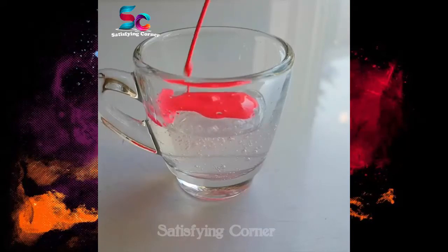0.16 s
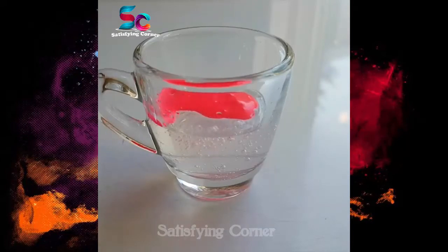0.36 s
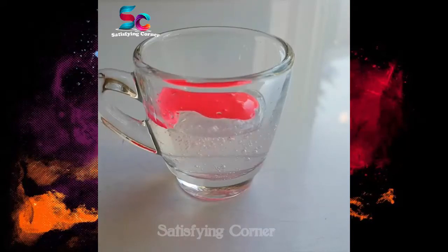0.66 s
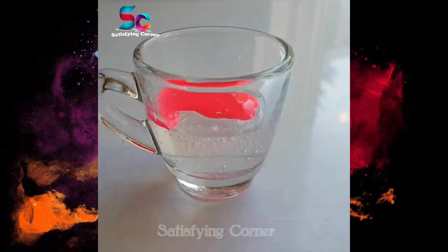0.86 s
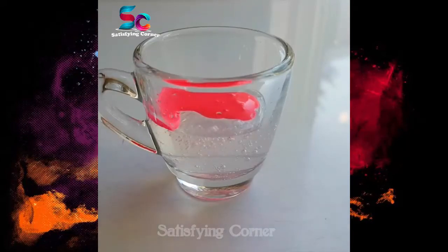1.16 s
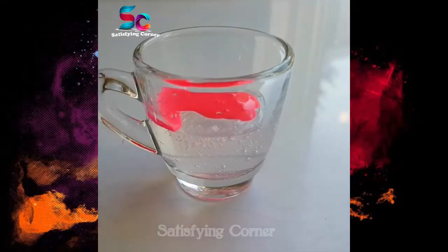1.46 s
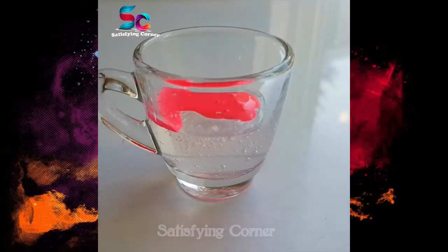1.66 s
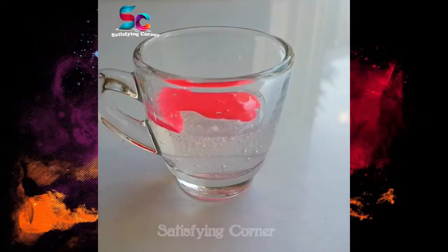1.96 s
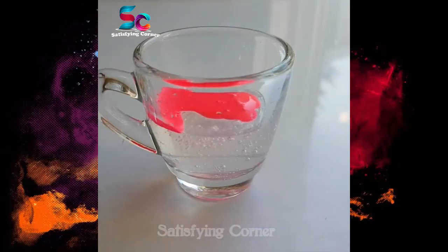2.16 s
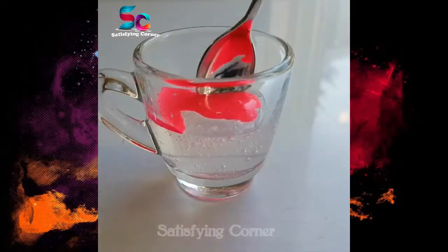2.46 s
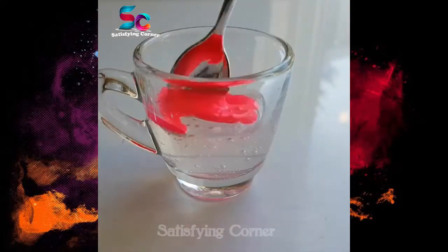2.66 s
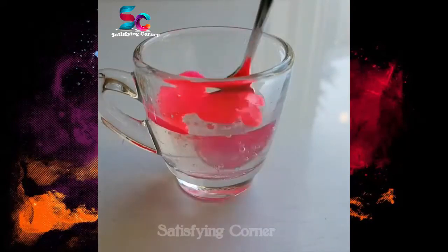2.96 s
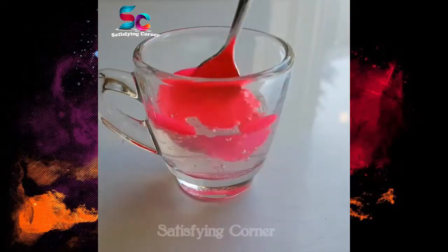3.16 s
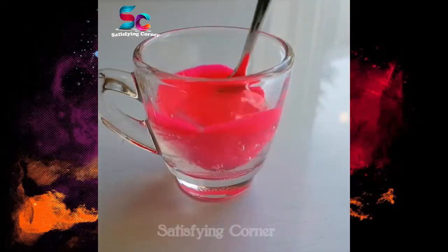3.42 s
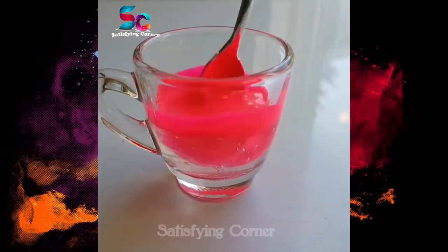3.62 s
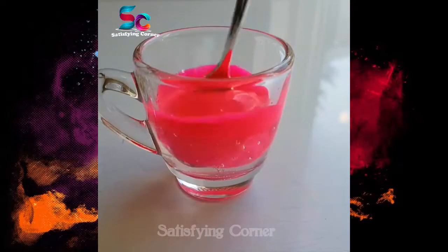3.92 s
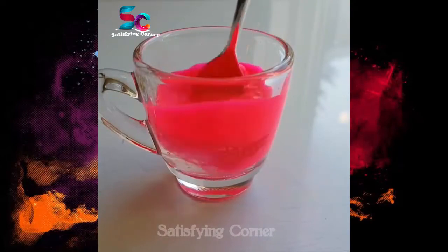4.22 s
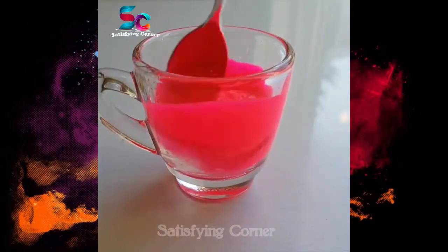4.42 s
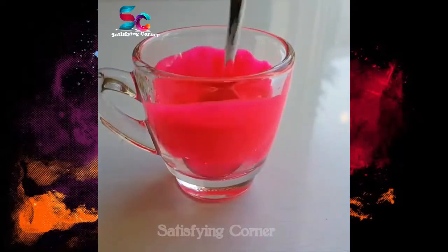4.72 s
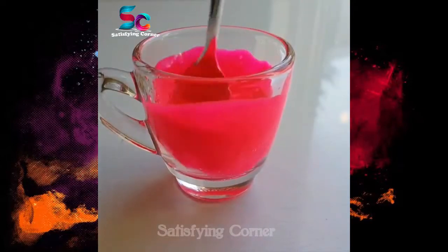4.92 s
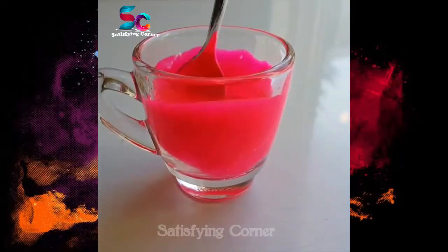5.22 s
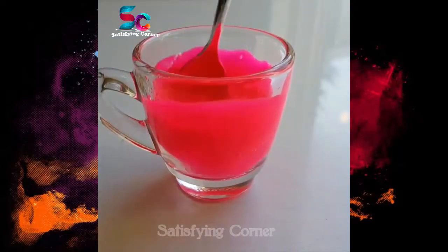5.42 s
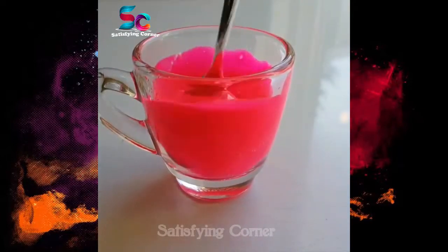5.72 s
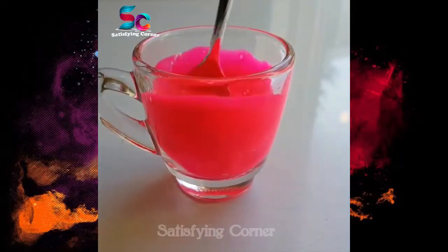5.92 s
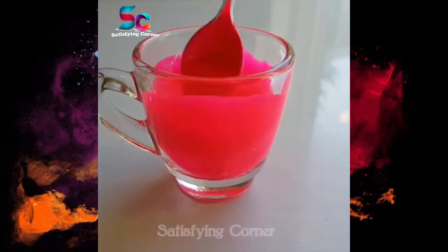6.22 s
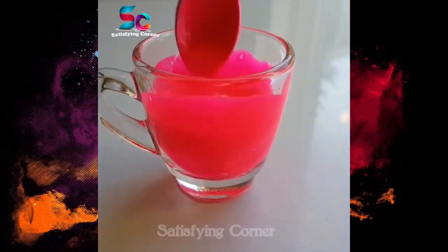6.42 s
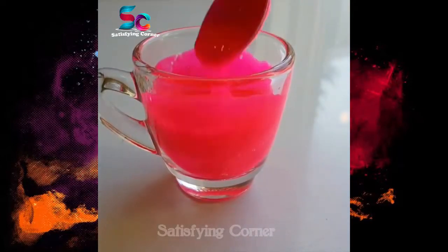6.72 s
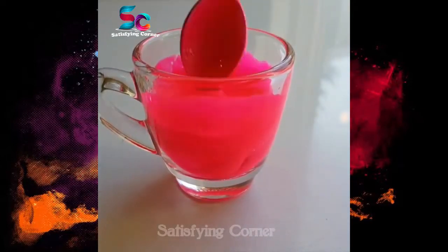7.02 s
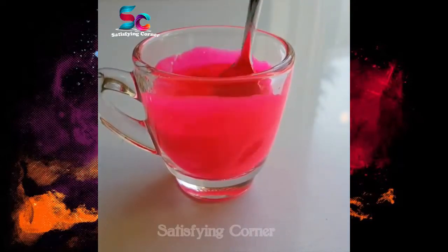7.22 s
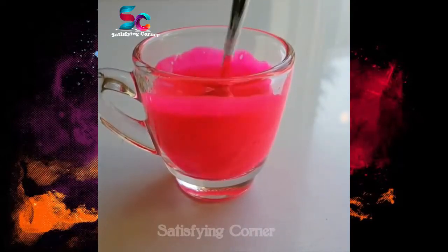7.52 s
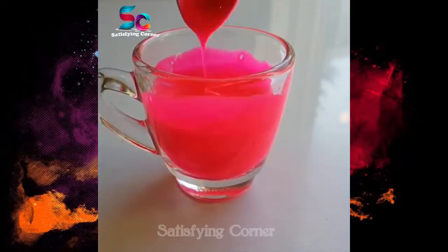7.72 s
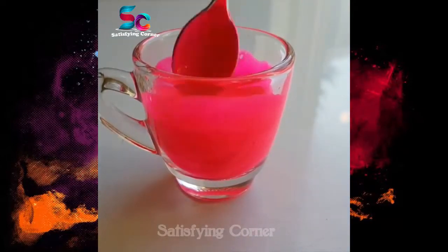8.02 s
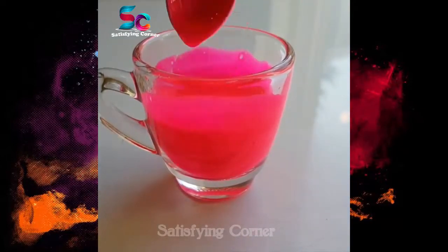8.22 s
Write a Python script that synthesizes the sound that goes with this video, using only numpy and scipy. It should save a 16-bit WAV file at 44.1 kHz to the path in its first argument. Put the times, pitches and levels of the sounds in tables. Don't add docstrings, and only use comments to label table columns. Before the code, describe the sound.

Over a soft low room hum, plastic crackles and one table thud come first, then a spoon ticks lightly against a glass cup of thick paint.

```python
import sys
import numpy as np
from scipy import signal
from scipy.io import wavfile
from scipy.ndimage import uniform_filter1d, minimum_filter1d

SR = 44100
rng = np.random.default_rng(int(sys.argv[2]) if len(sys.argv) > 2 else 0)


def magnitude_from_level(level_db):
    exponent = np.asarray(level_db, float) / 20
    return 10 ** exponent


def persist_wave(psi):
    counts = np.round(np.clip(psi, -1, 1) * 32767).astype(np.int16)
    wavfile.write(sys.argv[1], SR, np.atleast_2d(counts).T)


N = 369116

# f/Hz, left-right likeness
LIKENESS = [(25, 0.8), (70, 1), (180, 0.99), (550, 0.8), (1650, 0.028), (4970, -0.23), (15000, -0.049)]


def evened(x):
    return x / np.sqrt(np.mean(x ** 2) + 1e-20)


def read(points, hz):
    f, value = np.transpose(points)
    return np.interp(np.log(hz + 1), np.log(f + 1), value)


def follow(curve):
    s, *columns = np.transpose(curve)
    return [np.interp(np.arange(N) / SR, s, column) for column in columns]


def add(mix, s, sound):
    part = mix[:, round(s * SR):][:, :sound.shape[1]]
    part += sound[:, :part.shape[1]]


def dulled(x, hz):
    return signal.lfilter(*signal.butter(2, min(hz, 20000), fs=SR), x)


def ring(hz, db, rise, hold, turn, size=600):
    t = np.arange(size) / SR
    smother = np.exp(-(t / hold) ** 3)
    return magnitude_from_level(db) * (1 - np.exp(-t / rise)) * smother * np.sin(2 * np.pi * (hz * t + turn))


def noise(level_db, patchy_db, order=1):
    size = 2048 // order
    frames, hz = N // 512 + 5, np.fft.rfftfreq(size, order / SR)
    a, b, c, d, patches = rng.standard_normal((frames, len(hz), 5)).T
    patches = uniform_filter1d(uniform_filter1d(patches, size=12, axis=0), size=8, axis=1)
    same = np.clip(read(LIKENESS, hz), -1, 1)[:, None]
    left = a + 1j * b
    right = same * left + np.sqrt(1 - same ** 2) * (c + 1j * d)
    z = np.array([left, right]) * magnitude_from_level(level_db(hz)[:, None] + patchy_db * evened(patches))
    x = signal.istft(z, nperseg=size, noverlap=1536 // order)[1]
    return evened(signal.resample_poly(x, order, 1, axis=1)[:, :N])


def hum():
    surges = [(0.119, 0.34365, -45.5, 114.3), (.58, 0.27, -46, 108.2), (.87, .3, -47, 111.6),
              (1.14, 0.2, -46, 113), (1.33, 0.175, -44, 112.8), (1.55, 0.343, -46.5, 122.1),
              (1.9, 0.32, -47.5, 121.5), (2.38, 0.4167, -47, 112.2), (2.661, .22, -46, 111.8),
              (2.999, .44, -50, 114.7), (3.41, .26, -48, 118.6), (3.721, .46, -48.5, 108.9),
              (4.04, 0.22, -61, 112), (4.39, .22, -53, 107.7), (4.6, .16, -54, 120.2),
              (4.93, 0.31745, -48.5, 117.3), (5.15, 0.21, -48, 112.6), (5.47, 0.281, -48.5, 108.1),
              (5.829, 0.36, -45, 111.3), (6.18, 0.259, -46, 108.6), (6.398, 0.1894, -42.5, 112.4),
              (6.641, .18, -50, 113.8), (7.1, 0.555, -46, 109.1), (7.448, .3, -49.5, 107.9),
              (7.762, 0.2689, -46, 116.7), (8.041, 0.25346, -45, 113.7), ]
    waver_hz = 5.33
    out = np.zeros((2, N + SR))
    for s, length, db, hz in surges:
        t = np.arange(round(1.3 * length * SR)) / SR
        waver = waver_hz * evened(uniform_filter1d(rng.standard_normal(SR), size=2000))
        turns = np.cumsum(hz + waver[:len(t)]) / SR
        swell = magnitude_from_level(db + 1.0) * np.sin(np.pi * t / t[-1]) ** 0.99
        surge = swell * np.sin(2 * np.pi * turns + np.array([[.07], [-.07]]))
        add(out, s - t[-1] / 2 + 1, surge)
    return out[:, SR:]


def room_tone():
    # t/s, rumble level/dB, draught hiss level/dB
    outside = [(0, -55.5, -78), (.7, -55, -79), (1.2, -55.5, -74.5), (1.75, -53.5, -78), (2.1, -55, -73.5),
               (2.5, -54, -74.5), (2.85, -54, -80.5), (3.25, -54.5, -80), (3.55, -54, -76),
               (4, -52.5, -78.5), (4.3, -50.5, -72), (5.05, -53.5, -78), (5.5, -53, -73.5),
               (6.25, -54, -78), (6.75, -54.5, -78.5), (7.6, -50.5, -75), (8.37, -51.5, -78)]
    # t/s, level/dB
    lorries = [(0, -65.5), (3.38, -71), (3.71, -74), (4.03, -64), (4.85, -56.5), (5.06, -65), (5.31, -56.5),
               (5.87, -54.5), (6.27, -65), (6.6, -58), (6.85, -68.5), (8.37, -67.5)]
    # f/Hz, level/dB (per Hz)
    rumble_spectrum = [(20, -37), (80, -41), (100, -15), (150, -7.5), (192, -14.5), (275, -11.5),
                       (339, -22), (418, -19), (505, -18), (560, -23), (988, -30), (3000, -43),
                       (6600, -73.5)]
    hiss_spectrum = [(880, -39), (1500, -6), (2080, -5.5), (3450, -1.5), (10100, -13), (12200, -11.5),
                     (13700, -38.5), (16000, -44)]

    rumble_db, hiss_db = follow(outside)
    fuzz = noise(lambda hz: -20 * np.log10(1 + ((hz - 113) / 16) ** 2), patchy_db=-1.5, order=32)
    street = noise(lambda hz: -20 * np.log10(0.12 + abs(hz / 64 - 64 / (hz + 1)) ** 1.2),
                   patchy_db=-4.5, order=16)
    rumble = noise(lambda hz: read(rumble_spectrum, hz), patchy_db=2.02, order=4)
    hiss = noise(lambda hz: read(hiss_spectrum, hz), patchy_db=3.0)
    low = hum() + magnitude_from_level(-56.5) * fuzz + magnitude_from_level(follow(lorries)[0]) * street
    return low + magnitude_from_level(rumble_db + 3.0) * rumble + magnitude_from_level(hiss_db + 11.0) * hiss


def swish():
    # t/s, half length/s, level/dB
    car = (8.08, 0.59, -63.5)
    s, half, db = car
    tyres = noise(lambda hz: -20 * np.log10(.5 + (hz / 1400 - 1400 / (hz + 1)) ** 2),
                  patchy_db=5.5, order=4)
    return magnitude_from_level(db) * tyres * np.exp(-((np.arange(N) / SR - s) / half) ** 2)


def moans():
    # t/s, length/s, f/Hz, glide/Hz, level/dB
    soft_tones = [
        (0, 0.28, 228, -4, -58.5),
        (3.401, 1, 410, 4, -62.5),
        (4.099, 0.48, 411.4, 5, -60.5),
        (4.203, 0.11, 158.5, 5, -52),
        (6.33, 0.21, 505, 3, -58.5),
        (6.899, 0.558, 258.6, 22.5, -54),
        (7.1, 0.295, 465.5, 9, -59),
        (7.804, 0.34, 446, 10.5, -56.5),
        (2.005, 0.021, 1086, 2.5, -60),
    ]
    out = np.zeros((2, N))
    for s, length, hz, glide_hz, db in soft_tones:
        u = np.linspace(0, 1, round(length * SR))
        waver = 6.4 * evened(uniform_filter1d(rng.standard_normal(SR), size=2500))
        pitch = hz + glide_hz * u + waver[:len(u)]
        swell = magnitude_from_level(db + 3.5) * np.sin(np.pi * u) ** 0.45
        add(out, s, swell * np.sin(2 * np.pi * np.cumsum(pitch) / SR) * np.ones((2, 1)))
    return out


def table():
    # f/Hz, level/dB, t60/s
    top_modes = [(251.6, 0, 0.064), (317, -8, 0.13), (462.1, -10, 0.153), (693, -23, 0.092),
                 (920, -15.5, 0.038), (1263, -31.5, 0.03117), (1649.2, -24, 0.0235)]
    # t/s, level/dB
    thuds = [
        (1.5697, -15.5),
        (1.645, -34),
    ]
    # t/s, level/dB, f/Hz
    pushes = [(4.375, -42, 209.6), (4.496, -40.5, 212), (4.726, -35, 197), (4.962, -33, 220),
              (5.202, -37, 208.3), (5.491, -34, 205), (5.589, -33.5, 221.3), (5.694, -36, 212),
              (5.818, -32, 204), (6.016, -38, 203), (6.207, -35, 212), (6.624, -32.5, 195.6),
              (7.632, -33, 218)]

    out, t = np.zeros((2, N)), np.arange(9000) / SR
    top = sum(magnitude_from_level(db - 60 * t / t60) * np.sin(2 * np.pi * (hz * (t - .0016) + 0.17))
              for hz, db, t60 in top_modes)
    dent = ring(495.0, 2.0, 0.00053, 0.0032, 0, size=9000)
    top = top * (1 - np.exp(-(t / 0.002115) ** 2)) - dent
    shudder = np.diff(rng.standard_normal((2, 9000)), prepend=0)
    for hz in (476, 1000, 1380):
        shudder = dulled(shudder, hz)
    shudder = evened(shudder)
    shudder_level = magnitude_from_level(-19 - 60 * t / 0.21) * np.minimum(t / 0.0023, 1)
    top = top + shudder_level * (shudder + 0.38 * shudder[::-1])
    for s, db in thuds:
        add(out, s, magnitude_from_level(db) * top * magnitude_from_level([[-.7], [.7]]))
    for s, db, hz in pushes:
        add(out, s, ring(hz, db + 0.5, 0.002, 0.01, 0, size=2500) * np.ones((2, 1)))
    return out


def crackles():
    # t/s, level/dB, lower mode level/dB, left-right level/dB, length/ms
    snaps = [(.363, -45.5, -75, 3.5, 2.2), (.383, -43.5, -71, -1, 5.7), (0.3976, -37, -46, 2, 3.7),
             (0.4273, -57.5, -70, 3.5, 2.73), (0.5016, -44, -74, 7.5, 2.6), (0.9512, -21, -35, 4, 1.3),
             (0.958, -27, -60.5, -8, 0.31), (0.9648, -41, -43, 0, 3), (0.9672, -30, -35, -4, 1.9),
             (0.9707, -52, -38, -2.5, 4.8), (0.975, -33, -40, -3, 2.2), (0.981, -47, -40.5, 3, 3.2),
             (0.982, -46, -42, -1.5, 2.5), (1.5718, -41.5, -74, 0, 12), (2.0167, -38, -69, -2, 2.6)]
    slack_hz, taut_hz = 5000, 6900
    out, t = np.zeros((2, N)), np.arange(900) / SR
    for (s, db, low_db, pan_db, ms), grit in zip(snaps, rng.standard_normal((len(snaps), 2, 900))):
        decay = np.exp(-1000 * t / ms) * np.minimum(t / (0.0003 * ms), 1)
        slip = 5.2 * (t == 0)
        spit = 1.17 * (grit + 0.27 * grit[::-1]) * decay + slip
        hz = taut_hz if 0.9 < s < 1.1 else slack_hz
        low_hz = 2700 + 150 * np.tanh(grit[0, 0])
        modes = ring(hz, db - 16.5, 0.00011, 0.00045, 0)
        modes = modes + ring(low_hz, low_db - 14.0, 0.00028, 0.00101, 0)
        wide = magnitude_from_level(db - 13.0) * dulled(dulled(np.diff(spit, prepend=0), 12000), 12000)
        snap = wide + signal.fftconvolve(spit, modes[None], axes=1)[:, :900]
        add(out, s, snap * magnitude_from_level([[pan_db / 2], [-pan_db / 2]]))
    return out


def scrapes():
    # t/s, length/s, level/dB
    slides = [
        (4.899, 0.12, -65),
        (6.204, 0.086, -62.5),
        (7.027, 0.065, -58.5),
        (7.563, 0.069, -61),
        (7.666, 0.054, -59),
    ]
    out, size = np.zeros((2, N)), SR // 5
    for (s, length, db), grit in zip(slides, rng.standard_normal((len(slides), 3, size))):
        grains = magnitude_from_level(1.6 * evened(dulled(grit[2], 309.4)))
        wet = grit[:2] * grains
        wall = signal.fftconvolve(wet, ring(3930, 0, .0001, 0.00036, 0)[None], axes=1)[:, :size]
        wet = evened(dulled(np.diff(wet, prepend=0), 6900) + 0.28 * wall)
        count = round(length * SR)
        add(out, s, magnitude_from_level(db) * wet[:, :count] * signal.windows.tukey(count, .4))
    return out


def touches():
    # t/s, right wall mode level/dB, high mode level/dB, high mode f/Hz,
    # sharp edge level/dB
    left_taps = [(3.482, -20.5, -15.5, 4820, -34), (3.707, -35.5, -23, 4960, -45),
                 (4.194, -34, -19.5, 5000, -38), (4.3038, -24, -11, 5052, -31.5),
                 (4.421, -28.5, -18, 4820, -42), (4.4985, -38, -20.5, 5400, -37),
                 (4.802, -35, -27.5, 4687, -45), (4.853, -31.5, -34.5, 4857, -51.5),
                 (4.9226, -31.5, -34, 4770, -38.5), (4.9623, -36, -27, 4801, -53.5),
                 (5.204, -19.5, -20, 4700, -45), (5.224, -21, -20, 5100, -45),
                 (5.3335, -31, -11, 5240, -32), (5.523, -24.5, -21, 4830, -38),
                 (5.7668, -31.5, -31, 5250, -40), (5.8477, -26, -21, 5130, -46),
                 (5.916, -27.5, -29, 4540, -48.5), (5.9465, -43, -30.5, 5450, -51),
                 (6.0424, -33, -22.5, 5400, -45), (6.1358, -28, -14.5, 5210, -37),
                 (6.2098, -22.5, -20.5, 4811, -42.5), (7.0219, -29.5, -30.5, 4770, -42),
                 (7.3998, -29, -21, 4820, -44.5), (7.4682, -29, -33, 5200, -52),
                 (5.306, -28.5, -32, 4610, -54), (5.683, -31, -35, 5100, -44),
                 (5.693, -32, -36.5, 5300, -51.5), (7.2568, -26.5, -31.5, 5300, -42.5)]
    # t/s, low mode level/dB, high mode
    # level/dB, low mode f/Hz, sharp edge level/dB
    other_taps = [(3.902, -31.5, -45, 3540, -54.5), (4.267, -33.5, -39.5, 3560, -55.5),
                  (4.381, -20.5, -37, 3800, -44.5), (5.4088, -36.5, -41, 4015, -59.5),
                  (5.4926, -31.5, -36, 3880, -46), (5.5911, -20.5, -36, 3960, -45),
                  (5.8193, -20.5, -26, 4010, -44.5), (6.0202, -30.5, -36.5, 4160, -54.5),
                  (6.2858, -36.5, -48, 4255, -50.5), (6.292, -32, -42, 4080, -55),
                  (6.622, -32.5, -40.5, 4100, -42), (7.472, -22.5, -26, 4300, -45),
                  (7.5555, -23, -33.5, 4130, -48.5), (7.635, -24.5, -37, 4000, -50),
                  (3.436, -47, -44.5, 4070, -54), (3.6585, -56, -50, 3977, -58.5),
              (4.261, -44.5, -46, 4150, -64), (4.5723, -45, -41, 4597, -43.5),
              (4.6938, -41, -64.5, 3730, -43), (4.725, -45.5, -69, 4018, -65),
              (4.99, -53, -46, 4320, -60.5), (5.1344, -51, -55, 4420, -62), (5.4281, -53, -41, 4080, -70),
              (5.6462, -45, -52, 3865, -49.5), (6.0055, -36, -58, 4080, -48.5),
              (6.109, -58, -64, 4180, -67), (7.5817, -42.5, -50.5, 4450, -65),
              (8.0423, -52, -37, 4430, -35.5), (5.301, -46, -49, 4300, -49), (5.3105, -31, -48, 3950, -62),
              (5.8543, -36, -46, 4330, -62), (6.025, -41, -48, 4200, -60), (7.7, -51, -52, 4200, -68),
              (5.08, -55, -59, 4100, -71)]
    right_hz, left_leak_db = 4307, -17
    high_ratio = 1.262
    apart, deep_hz = 0.047, 3700

    found = []
    for s, low, high, hz, edge in left_taps:
        found.append((s, (low + left_leak_db, low), (right_hz, right_hz), high, hz, edge))
    for s, low, high, hz, edge in other_taps:
        low_hz = hz * (1 + apart * (hz > deep_hz) * np.array([-1, 1]))
        found.append((s, (low, low + 0.6), low_hz, high, hz * high_ratio, edge))
    return found


def ticks():
    # f/Hz, level/dB
    edge_modes = [(6900, 7.5), (9000, 9.5), (10300, 9.5), (12900, 2.5), (15500, -5.5)]
    out, t = np.zeros((2, N)), np.arange(600) / SR
    taps = touches()
    chances = rng.random((len(taps), 24))
    grits = rng.standard_normal((len(taps), 2, 600))
    for (s, low_db, low_hz, high_db, high_hz, edge_db), chance, grit in zip(taps, chances, grits):
        low = np.array([ring(low_hz[side], low_db[side] + 3.0, 0.00046, 0.0019, chance[0] - 0.13 * side)
                        for side in (0, 1)])
        high = ring(high_hz, high_db + 4.5, 0.00019, 0.0011, chance[1])
        high = high + ring(1172, high_db - 10.0, 0.0006, 0.00099, chance[2])
        edge = np.zeros((2, 600))
        for side in (0, 1):
            for k, (hz, db) in enumerate(edge_modes):
                detuned_hz = hz * (0.906 + 0.14 * chance[3 + k])
                turn = chance[8 + k + 5 * side]
                edge[side] += ring(detuned_hz, edge_db + db - 0.5, 0.0003, 0.0011, turn)
        spit = magnitude_from_level(edge_db + 8.0) * dulled(grit, 8500) * np.exp(-t / 0.002)
        shade_db = [[0], [-1.0 - 0.4 * np.clip(high_db - low_db[1], 0, 15)]]
        add(out, s - .0004, low + (edge + spit) * magnitude_from_level(shade_db) + high * magnitude_from_level([[0], [-16]]))
    return out


def room(x):
    # f/Hz, t60/s
    decay_times = [(200, 0.13), (1000, 0.1264), (4000, 0.15), (8000, 0.44), (14000, 0.033)]
    # f/Hz, level/dB
    wet_levels = [(200, -2.5), (1000, -6.5), (4000, -5.5), (7000, -16.5), (12000, -18)]
    # t/s, left level/dB, right level/dB
    reflections = [
        (.0023, -20, -21),
        (.0045, -17.5, -27.5),
        (0.0098, -27, -34.5),
    ]

    taps = np.zeros((2, SR // 2))
    slots = np.arange(200, SR // 2 - 40, 20)
    at = slots + rng.integers(0, 20, (2, len(slots)))
    np.put_along_axis(taps, at, rng.choice([-1., 1.], at.shape), 1)
    hz, t, z = signal.stft(taps, SR, nperseg=512)
    same = np.clip(read(LIKENESS, hz), 0, 1)[:, None]
    z[1] = same * z[0] + np.sqrt(1 - same ** 2) * z[1]
    fall_db = read(wet_levels, hz)[:, None] - 60 * t / read(decay_times, hz)[:, None]
    tail = signal.istft(z * magnitude_from_level(fall_db), SR, nperseg=512)[1] / 15
    tail[:, :150] = 0
    for s, *db in reflections:
        tail[:, round(s * SR)] += magnitude_from_level(db)
    return signal.fftconvolve((x + 0.86 * x[::-1]) / 1.208, tail, axes=1)[:, :N]


def scene():
    near = ticks() + crackles() + scrapes() + table()
    return near + room(near) + room_tone() + moans() + swish()


def thinned(x):
    hz, t, z = signal.stft(x, SR, nperseg=256)
    f, shape = hz[:, None], (len(hz), len(t))
    power = uniform_filter1d((abs(z) ** 2).mean(0), size=7, axis=0)
    band_db = 10 * np.log10(uniform_filter1d(power, size=3, axis=1) + 1e-20)
    usual_db = np.median(band_db, axis=1, keepdims=True)
    treble_db = band_db[(hz > 7000) & (hz < 12000)].mean(0)
    jump_db = -minimum_filter1d(-treble_db, size=10, origin=2) - treble_db
    beside = jump_db > 9
    busy = uniform_filter1d(1. * beside, size=60)

    luck_db = 5 * rng.standard_normal((shape[0] // 6 + 1, shape[1] // 3 + 1))
    luck_db = np.kron(luck_db, np.ones((6, 3)))[:shape[0], :shape[1]]
    empty = (band_db < usual_db + luck_db + f / 800 - 9) & beside & (f > 2500)
    slots = rng.random((shape[0] // 2 + 1, shape[1] // 16 + 1))
    slots = np.kron(slots, np.ones((2, 16)))[:shape[0], :shape[1]]
    empty |= (slots < .025 + .5 * busy * f / 12000) & (band_db < usual_db + 8) & (f > 1800)
    empty |= (band_db < -88) & (f > 13000 - 5000 * busy)
    struck = (band_db - usual_db)[(hz > 3500) & (hz < 6000)].max(0) > 24
    empty &= ~(struck & (f < 10000))
    return signal.istft(z * ~empty, SR, nperseg=256)[1][:, :N]


def roll_off(x):
    return signal.sosfilt(signal.butter(12, 16820, fs=SR, output="sos"), x)


def record(dry):
    limited = signal.oaconvolve(dry, signal.firwin(255, 16650, fs=SR)[None], "same")
    mix = thinned(limited) - .0008
    return roll_off(mix)


dry = scene()
out = record(dry)
persist_wave(out)
```